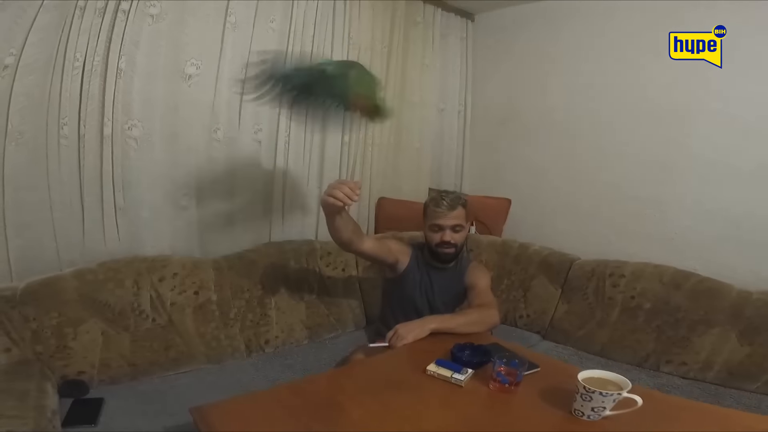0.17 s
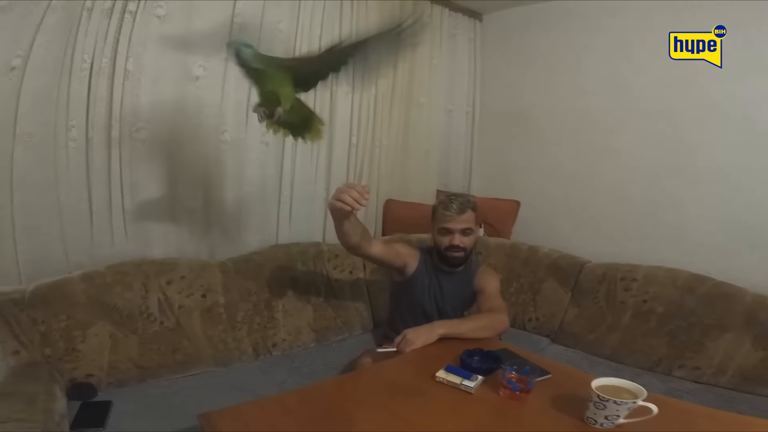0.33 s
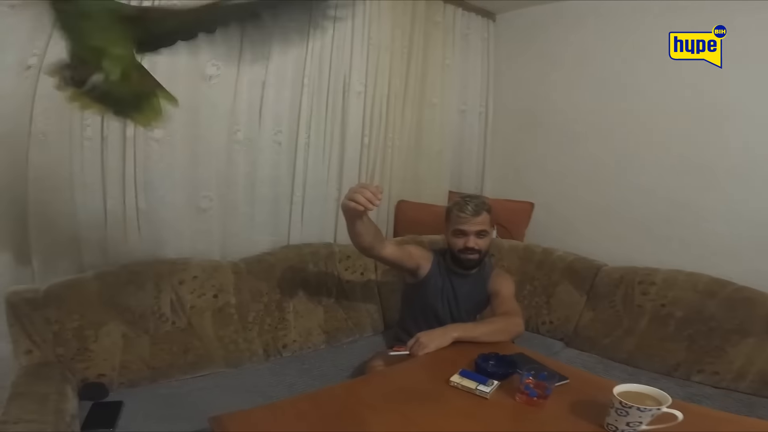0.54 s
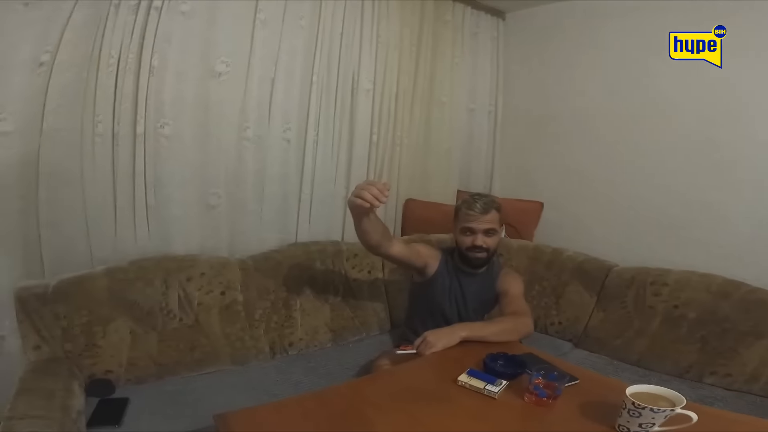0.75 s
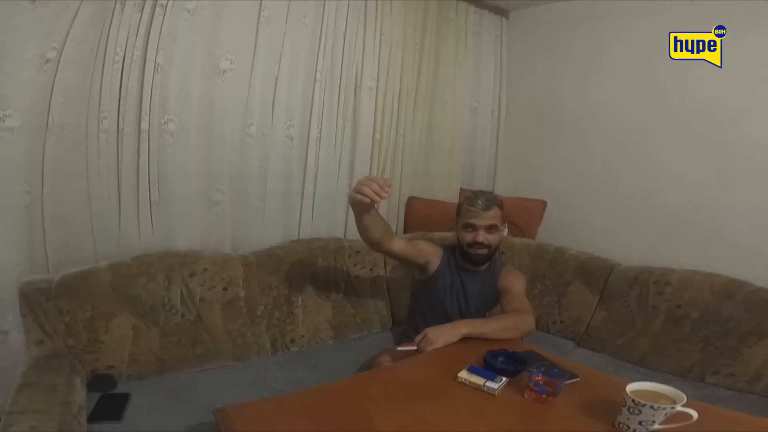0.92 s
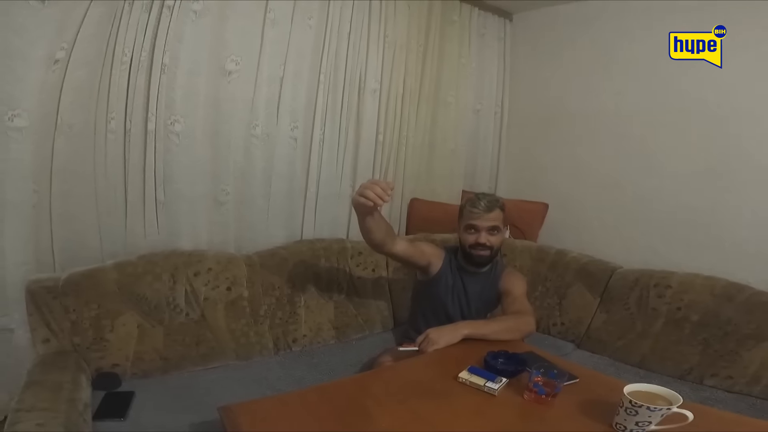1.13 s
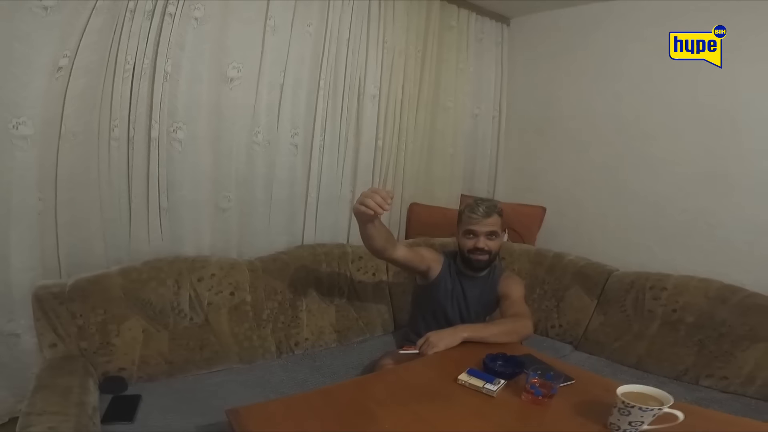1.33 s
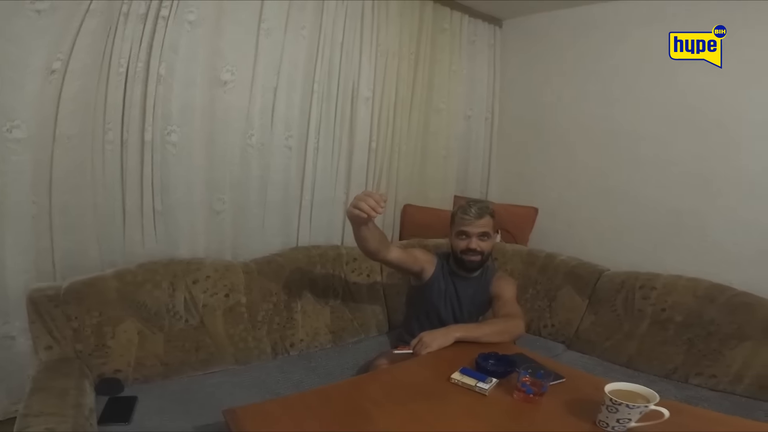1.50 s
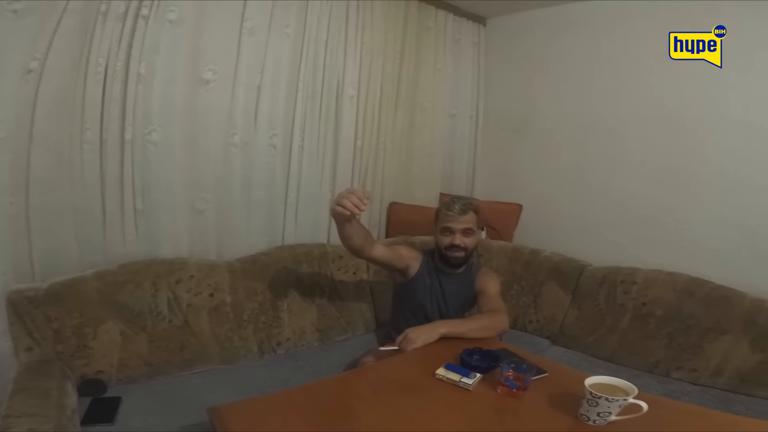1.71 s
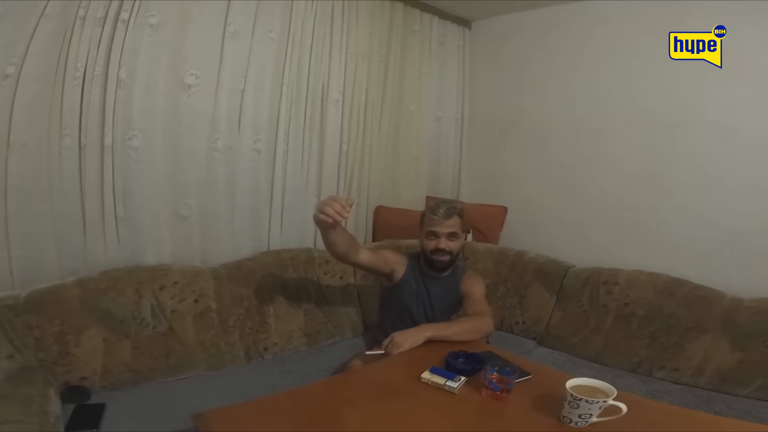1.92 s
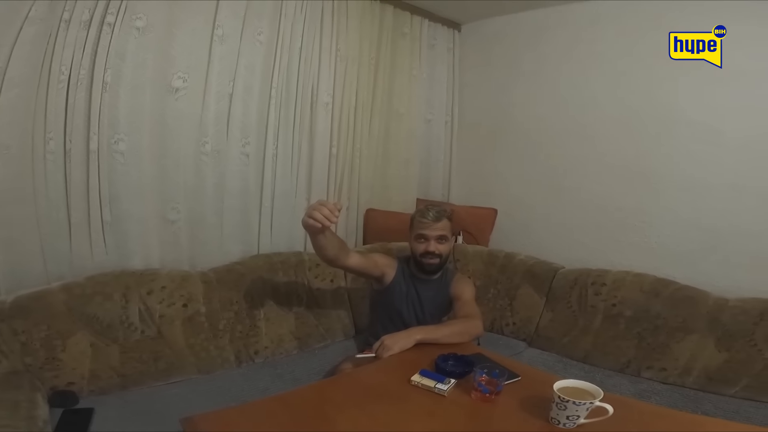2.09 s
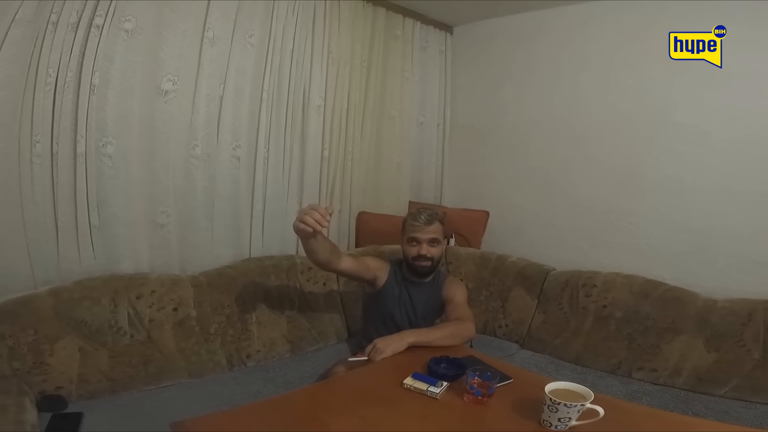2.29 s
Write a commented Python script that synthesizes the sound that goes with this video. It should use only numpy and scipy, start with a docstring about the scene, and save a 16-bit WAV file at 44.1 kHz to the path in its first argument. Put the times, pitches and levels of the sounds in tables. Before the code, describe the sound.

Rapid wingbeats of a parrot, deep soft thumps with airy swishes, a sharp ringing clack at half a second, then rumbling clipped wind blasts on the microphone, fading to quiet flutters in a lightly reverberant room.

```python
"""A parrot flies across a small living room and close past the microphone: each stroke is a low pressure pulse
that rings room resonances, and shaped noise gives the feathers' rush, swishes and last flaps.
Soft puffs and feather ticks join the strokes; one sharp hollow snap, of decaying sines and noise, rings on.
The parrot's wake buffets the microphone twice, as turbulent noise with pointed pressure dips.
The input clips whatever exceeds full scale."""
import sys
import numpy as np
from scipy import signal
from scipy.fft import rfft, irfft
from scipy.io import wavfile

SR = 44100
rng = np.random.default_rng(int(sys.argv[2]) if len(sys.argv) > 2 else 0)


def int16_out(signal):
    """Quantize to a 16-bit WAV file."""
    q = np.round(np.clip(np.atleast_2d(signal).T, -1, 1) * 32767)
    wavfile.write(sys.argv[1], SR, q.astype(np.int16))


N = 103635
T, HZ = np.arange(N) / SR, np.fft.rfftfreq(N, 1 / SR)


def amp(db):
    """Decibels to amplitude gain."""
    return 10 ** (np.asarray(db) / 20)


def evened(x):
    """Normalizes to unit rms."""
    return x / np.sqrt(np.mean(x ** 2) + 1e-20)


def spectrum(points):
    """Interpolates (Hz, value) points on a logarithmic frequency axis."""
    f, value = np.transpose(points)
    return np.interp(np.log(HZ + 1), np.log(f), value)


def curve(points):
    """Interpolates (s, value) points linearly in time."""
    return np.interp(T, *np.transpose(points))


def panned(db):
    """Level-difference stereo: left and right gains, left over right in dB."""
    return amp(np.array([[db], [-db]]) / 2)


def noise(db, same):
    """Partly coherent stereo noise: the mid-side balance sets the left-right likeness at each frequency."""
    mid, side = rfft(rng.standard_normal((2, N)))
    same = np.clip(same, -1, 1)
    mid = mid * np.sqrt(1 + same)
    side = side * np.sqrt(1 - same)
    return evened(irfft(np.array([mid + side, mid - side]) * amp(db), N))


def wander(hz):
    """Low-pass random modulation of unit rms, with a Gaussian spectrum of the given width."""
    return evened(irfft(rfft(rng.standard_normal(N)) * np.exp(-(HZ / hz) ** 2), N))


def octaves(x):
    """Filter bank of overlapping octave bands that sum to the input: (centre Hz, band)."""
    centres = np.geomspace(62.5, 16000, 9)
    z = rfft(x)
    bands = []
    for i, f in enumerate(centres):
        weight = np.eye(len(centres))[i]  # one at this centre, zero at the others
        bands.append((f, irfft(z * spectrum(list(zip(centres, weight))), N)))
    return bands


# Reverberation of the room. Each row: frequency in Hz, 60 dB decay time in seconds.
ROOM_DECAY = [(150, 0.39), (1000, 0.38), (3000, 0.21), (7000, 0.53), (14000, 0.41)]
# Coherence of diffuse sound at the two channels. Each row: frequency in Hz, left-right likeness (1 is identical).
LIKENESS = [(50, 1), (290, 0.98), (1400, 0.81), (3000, 0.65), (7000, 0.78), (15000, 0.27)]


def room(x, tail_db):
    """Reverberation: direct sound plus a diffuse tail in which each octave decays at its own rate."""
    tail = np.zeros((2, N))
    for f, band in octaves(noise(0 * HZ, spectrum(LIKENESS))):
        t60 = np.interp(f, *np.transpose(ROOM_DECAY))
        tail += band * amp(-60 * T / t60)
    tail = tail * np.minimum(T / 0.0028, 1)  # build-up in seconds
    tail = amp(tail_db) * tail / np.linalg.norm(tail[0])
    return x + signal.fftconvolve(x, tail, axes=1)[:, :N]


# Strength of the air's motion. Each row: time in seconds, level in dB.
STIR_LEVEL = [(0, -36.5), (.2, -26), (.6, -20), (.95, -16.5), (1.15, -26), (1.5, -23), (1.75, -34.5),
              (2.0, -34.5), (2.24, -27.5), (2.35, -39.5)]
# Colour of its rumble. Each row: frequency in Hz, relative density in dB per Hz.
RUMBLE_COLOUR = [(12, -25), (30, 4), (58, -2), (100, -15), (140, -8), (190, -28), (265, -19), (380, -31),
                 (800, -45), (3000, -77)]


def stirred_air():
    """Broadband flow noise: the low rumble of the air that the wings keep moving."""
    return amp(curve(STIR_LEVEL)) * noise(spectrum(RUMBLE_COLOUR), spectrum(LIKENESS))


SNAP_S = 0.5422  # moment of the snap in seconds
# Hollow's modes. Each row: frequency in Hz, relative level in dB, 60 dB decay time in seconds.
HOLLOW_MODES = [(1053, 0, 0.12), (1150, -23, 0.21)]
# Returns from the walls. Each row: delay in seconds, level in dB relative to the first ring.
WALL_ECHOES = [(0.04, -1), (.097, -12)]


def snap_ring(ring_db=-9.5, echo_rise_s=0.0042, room_db=-8):
    """Modal resonance: a small hollow rings in decaying sines, renewed as the walls throw the ring back."""
    age = np.maximum(T - SNAP_S, 0)
    ring = np.zeros(N)
    for hz, db, t60 in HOLLOW_MODES:
        level = amp(-60 * age / t60)
        for delay, echo_db in WALL_ECHOES:
            late = np.maximum(age - delay, 0)
            level = level + np.minimum(late / echo_rise_s, 1) * amp(echo_db - 60 * late / t60)
        ring += amp(db) * level * np.sin(2 * np.pi * hz * age)
    return room(amp(ring_db) * ring * panned(0), tail_db=room_db)


# Colour of the crack. Each row: frequency in Hz, relative density in dB per Hz.
CRACK_COLOUR = [(300, -7), (1200, -0.5), (2500, -7), (4200, -4.5), (6000, -1), (7700, 0), (10000, -11.5),
                (12500, -16.5), (15000, -33)]
CRACK_DB, CRACK_S = -10.5, 0.0013  # level, time constant in s
SPLASH_DB, SPLASH_S = -23.5, 0.029  # level, time constant in s
TAIL_DB, TAIL_T60_S = -27, 0.52
CLACK_HZ, CLACK_WIDTH_HZ, CLACK_DB, CLACK_T60_S = 3235, 427, -14.5, 0.29


def snap_crack():
    """Impulsive excitation: noise falls as crack, splash and tail, beside the hollow's broad upper resonance."""
    age = np.maximum(T - SNAP_S, 0)
    crack = amp(CRACK_DB) * np.exp(-age / CRACK_S)
    splash = amp(SPLASH_DB) * np.exp(-age / SPLASH_S)
    tail = amp(TAIL_DB - 60 * age / TAIL_T60_S)
    burst = (crack + splash + tail) * noise(spectrum(CRACK_COLOUR), spectrum(LIKENESS))
    resonance = -20 * np.log10(1 + ((HZ - CLACK_HZ) / CLACK_WIDTH_HZ) ** 4)
    clack = amp(CLACK_DB - 60 * age / CLACK_T60_S) * noise(resonance, spectrum(LIKENESS))
    return (age > 0) * (clack + burst)


# Colour of turbulence before tilting. Each row: frequency in Hz, relative density in dB per Hz.
WIND_COLOUR = [(10, -5), (40, 1.5), (70, -1), (140, -6), (270, -6.5), (420, -13.5), (600, -22),
               (900, -30.5), (1400, -46), (2500, -67.5), (6000, -78), (16000, -100)]
WIND_REF_DB = -6  # gust level at which the tilt is as listed
BRIGHTEN, BRIGHT_HZ = 0.53, 308  # tilt in dB per octave for each dB of level; corner of the tilt
EDDY_DB, EDDY_HZ = 1.5, 69.4  # rms depth and rate of the lumps


def gust(points, pan_db, alike_hz):
    """Turbulent pressure at two ports: lumpy, brighter when stronger, and coherent only in the bass."""
    s, db, tilt = np.transpose(points)
    level = np.interp(T, s, db, left=-100, right=-100) - WIND_REF_DB + EDDY_DB * wander(EDDY_HZ)
    tilt = np.interp(T, s, tilt) + np.minimum(level, 2) * BRIGHTEN
    air = noise(spectrum(WIND_COLOUR), 1 / (1 + (HZ / alike_hz) ** 2))
    wind = np.zeros((2, N))
    for f, band in octaves(air):
        wind += band * amp(WIND_REF_DB + level + tilt * np.log2(1 + f / BRIGHT_HZ))
    return panned(pan_db) * wind


# Single eddies. Each row: time in seconds, level in dB before blunting, width in seconds, left over right in dB.
EDDY_THUMPS = [(1.2957, 0.5, 0.00068, -9), (1.2973, -0.5, 0.00047, -11.5), (1.3425, -8.5, .0005, -14),
               (1.3754, 2.5, 0.00077, -9), (1.4211, 7, 0.0011, -7), (1.4246, 5.5, 0.00052, -8),
               (1.4449, 2, 0.00072, -11.5), (1.4553, -8.5, 0.00028, -14), (1.5365, -17.5, 0.00044, -2),
               (1.611, -1, 0.0025, -1), (1.8984, 3.5, .0012, 9), (1.9799, -3.5, 0.0013, 4)]


def buffeted(wind, sharp_s=0.0017, blunt=0.35, clear_s=0.0021):
    """Vortex suction: small eddies replace the turbulence with pressure dips, more pointed when narrower."""
    dips = np.zeros((2, N))
    for s, db, width, pan in EDDY_THUMPS:
        u = np.hypot((T - s) / width, min(width / sharp_s, blunt))  # the second term rounds the tip
        dips -= panned(pan) * amp(db) * (1 - u) * np.exp(-u)
        wind = wind * (1 - np.exp(-((T - s) / clear_s) ** 2))
    return wind + dips


# Two gusts. Each row: time in seconds, level in dB before tilting, brightness tilt in dB per octave
# before the level adds its share.
WAKE_FIRST = [(1.27, -29, -5), (1.297, -10.5, 0.5), (1.325, -7.5, -3), (1.345, -11, 8.5), (1.375, -8.5, 4),
              (1.40, -8, -7), (1.423, -7.5, 5.5), (1.465, -8, -0.5), (1.49, -21, 10.5), (1.522, -20.5, 8),
              (1.538, -11, -3), (1.62, -9, -5), (1.655, -11, -4.5), (1.675, -53, 1)]
WAKE_SECOND = [(1.81, -33, -9), (1.84, -11, -9.5), (1.89, -11.5, -5.5), (1.908, -9, -1), (1.94, -7.5, -6),
               (1.962, -16, -13), (1.982, -14.5, -3.5), (2.005, -15, -13.5), (2.05, -13, -27.5),
               (2.088, -12, -11), (2.12, -16, -10.5), (2.17, -27, -8)]


def wake():
    """Wake turbulence: two gusts of the parrot's wake cross the microphone, with single eddies in them."""
    first = gust(WAKE_FIRST, pan_db=-3.0, alike_hz=210)
    second = gust(WAKE_SECOND, pan_db=-3.7, alike_hz=700)
    return buffeted(first + second)


# Feather flicks. Each row: time in seconds, level in dB, left over right in dB.
FEATHER_TICKS = [(.301, -17.5, 1.5), (.502, -10.5, 0), (0.7114, -6, 2.5)]
# Colour of the scuff. Each row: frequency in Hz, relative level in dB.
SCUFF_COLOUR = [(200, -4.5), (1000, 3), (3000, 4), (7000, 5), (11000, -5), (15000, -34)]


def ticks(width_s=0.00005, scuff_s=0.0088, scuff_db=-19):
    """Impulse and friction: stiff feathers flick together in a sharp two-sided pulse and a brief scuff."""
    hiss = noise(spectrum(SCUFF_COLOUR), spectrum(LIKENESS))
    flicks = np.zeros((2, N))
    for s, db, pan in FEATHER_TICKS:
        u = (T - s) / width_s
        pulse = 2 * u / (1 + u ** 2)
        scuff = amp(scuff_db) * (T >= s) * np.exp(-abs(T - s) / scuff_s) * hiss
        flicks += panned(pan) * amp(db) * (pulse + scuff)
    return room(flicks, tail_db=-2)


# Air shed by the wings. Each row: time in seconds, peak level in dB.
AIR_PUFFS = [(0.233, -24), (0.659, -19), (0.927, -30.5), (1.038, -26)]


def puffs(width_s=0.0075, pitch_hz=315, waver=0.107):
    """Frequency-modulated bursts: soft whumps of shed air, a few uneven cycles each."""
    level = sum(amp(db) * np.exp(-((T - s) / width_s) ** 2) for s, db in AIR_PUFFS)
    pitch = pitch_hz * (1 + waver * wander(pitch_hz))
    return level * np.sin(2 * np.pi * np.cumsum(pitch) / SR)


# Flaps behind the microphone. Each row: time in seconds, level in dB, rise in seconds, fade in seconds.
LAST_FLAPS = [(1.614, -34.5, 0.018, 0.047), (1.744, -41, 0.02, 0.046), (2.156, -37, 0.022, 0.14),
              (2.243, -33.5, 0.011, 0.075)]
# Colour of air through feathers, here and in the rush. Each row: frequency in Hz, relative density in dB per Hz.
FEATHER_COLOUR = [(30, 0), (130, 7.5), (280, 0), (450, 1), (750, -3.5), (1100, 0.5), (2000, -7),
                  (3200, -8.5), (5500, -11.5), (7500, -16), (10000, -23.5), (12500, -29.5), (15500, -39.5)]


def last_flaps(tilt_db=-0.44, boom_hz=258, boom_width_hz=24, boom_db=14.5):
    """Noise coloured by resonance: separate, duller swishes with one low room resonance raised."""
    level = np.zeros(N)
    for s, db, rise, fade in LAST_FLAPS:
        before, after = np.minimum(T - s, 0), np.maximum(T - s, 0)
        level += amp(db) * np.exp(-(before / rise) ** 2 - after / fade)
    tilt = tilt_db * np.log2(1 + HZ / 1000)  # dB per octave in the treble
    boom = boom_db * np.exp(-((HZ - boom_hz) / boom_width_hz) ** 2)
    return level * noise(spectrum(FEATHER_COLOUR) + tilt + boom, spectrum(LIKENESS))


# Steady rush as the bird nears and leaves. Each row: time in seconds, level in dB.
RUSH_LEVEL = [(0, -34), (.2, -31), (.29, -32), (.5, -30.5), (.8, -31.5), (.95, -33.5), (1.08, -37),
              (1.4, -38), (1.47, -51.5), (1.58, -45), (1.8, -49), (1.9, -50), (2.1, -50), (2.35, -52)]
# Down- and upstroke swishes. Each row: time in seconds, level in dB over the steady rush.
STROKE_SWISHES = [(0.041, -0.5), (.25, 2), (.298, 5), (.365, 0), (0.402, 2.5), (.472, 1), (.785, -0.5),
                  (.82, 4.5), (0.898, 1.5), (.937, 0.5), (1.011, 3), (1.128, 0.5), (1.25, 1.5)]


def feather_rush(swish_s=0.016, grain_db=1.52, grain_hz=250):
    """Amplitude-modulated flow noise: grainy hiss through feathers, its power swelling at each swish."""
    beat = sum(amp(db) ** 2 * np.exp(-((T - s) / swish_s) ** 2) for s, db in STROKE_SWISHES)
    level = amp(curve(RUSH_LEVEL) + grain_db * wander(grain_hz)) * np.sqrt(1 + beat)
    return level * noise(spectrum(FEATHER_COLOUR), spectrum(LIKENESS))


# Strokes of the wings. Each row: time in seconds, peak level of the pressure pulse in dB.
WING_STROKES = [(0.044, -26), (0.21, -16.5), (0.259, -18), (0.364, -21), (0.468, -18), (.514, -16),
                (0.623, -22), (.728, -7.5), (.833, -4.5), (0.941, -3), (1.052, -7), (1.164, -17.5),
                (1.284, -6.5)]
# Low room resonances. Each row: frequency in Hz, 60 dB decay time in seconds, relative level in dB.
ROOM_BOOM = [(35, 0.21, -9.5), (54.6, 0.34, -8.5), (138, .5, -4.5)]


def wing_pressure(push_s=0.0059, lag_s=0.0018):
    """Displaced air drives room modes: each stroke sucks, then pushes, and the room booms after it."""
    push = np.zeros(N)
    for s, db in WING_STROKES:
        u = (T - s) / push_s
        push += amp(db) * u * np.exp((1 - u ** 2) / 2)
    age = np.maximum(T - lag_s, 0)
    ring = np.zeros(N)
    for hz, t60, db in ROOM_BOOM:
        ring += amp(db - 60 * age / t60) * np.sin(2 * np.pi * hz * age) * hz / SR
    return push + signal.fftconvolve(push, ring)[:N]


def scene():
    """Superposition of the flight, the snap and the wake."""
    wings = wing_pressure() + stirred_air() + feather_rush() + puffs() + last_flaps() + ticks()
    return wings + snap_ring() + snap_crack() + wake()


# Stereo width. Each row: time in seconds, gain of the left-right difference in dB.
SIDE_GAIN = [(1.45, 1.5), (1.9, -7), (2.05, -6), (2.2, -27)]


def record(dry, edge_hz=15700):
    """Saturation and band limiting: the image narrows, a hard knee clips peaks, and a low-pass follows."""
    mid = dry.mean(0)
    heard = mid + (dry - mid) * amp(curve(SIDE_GAIN))
    clipped = heard / (1 + heard ** 16) ** (1 / 16)
    low_pass = signal.firwin(255, edge_hz, window=("kaiser", 8), fs=SR)
    return signal.oaconvolve(clipped, low_pass[None], "same")


dry = scene()
out = record(dry)
int16_out(out)
```